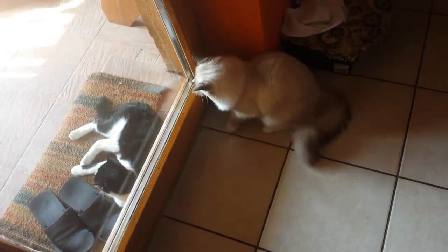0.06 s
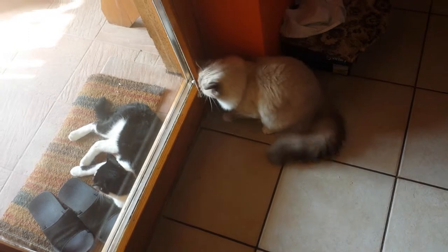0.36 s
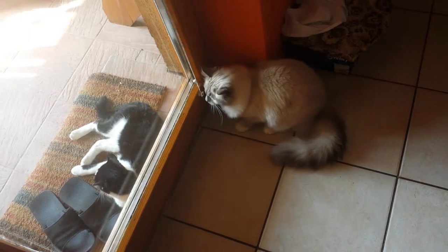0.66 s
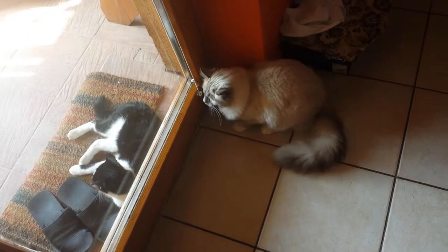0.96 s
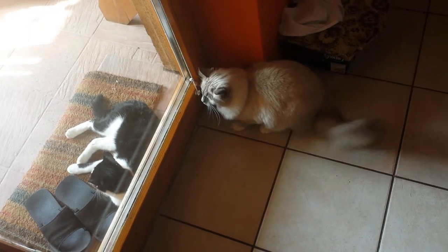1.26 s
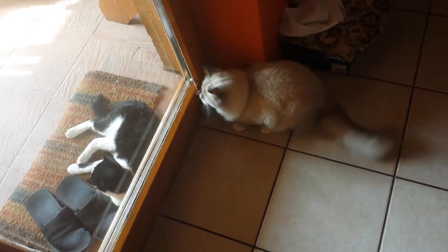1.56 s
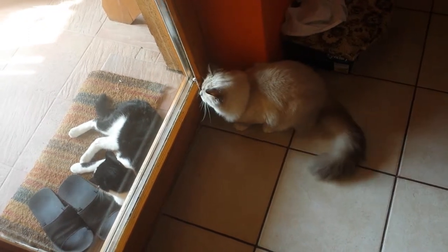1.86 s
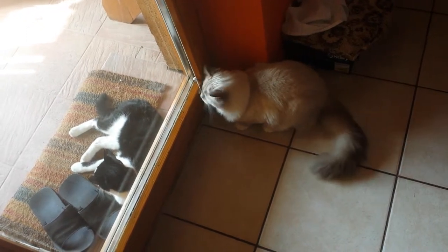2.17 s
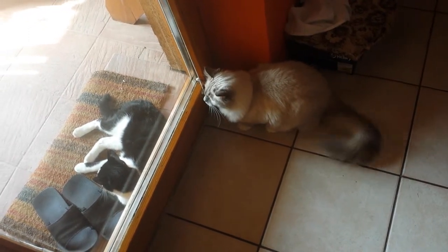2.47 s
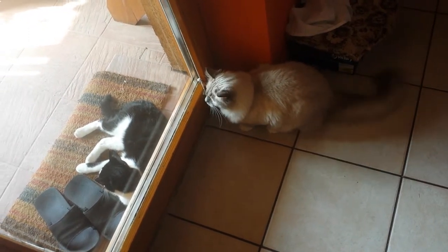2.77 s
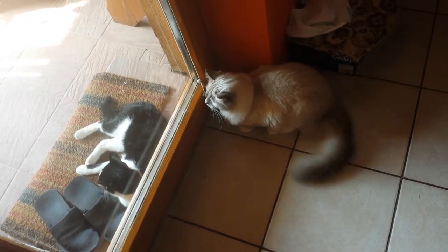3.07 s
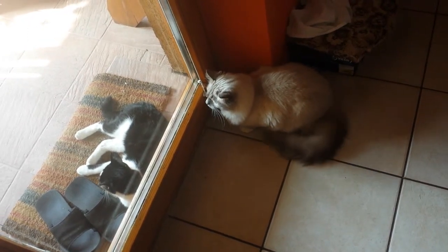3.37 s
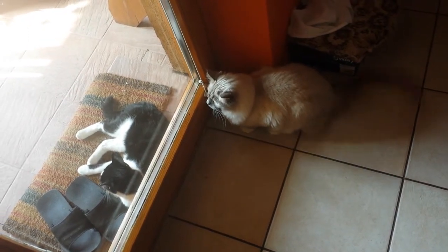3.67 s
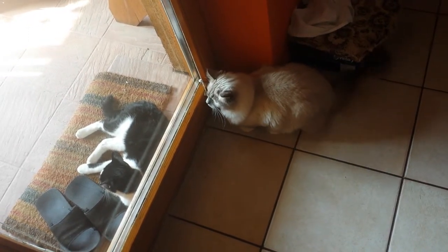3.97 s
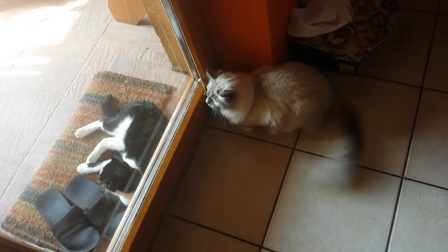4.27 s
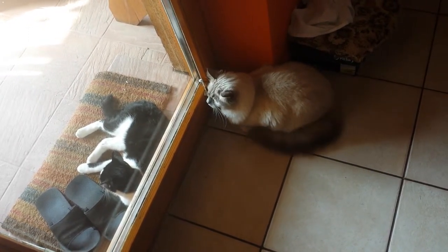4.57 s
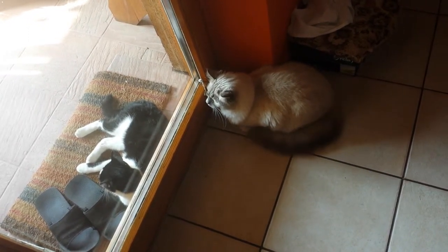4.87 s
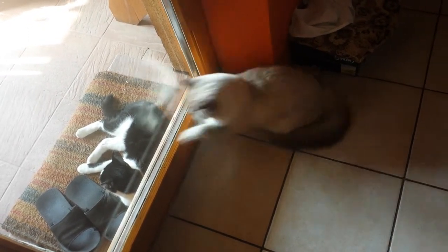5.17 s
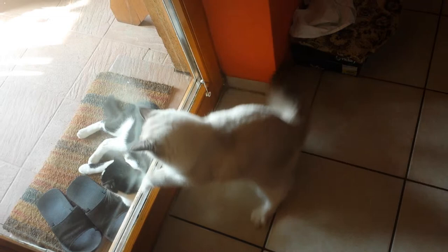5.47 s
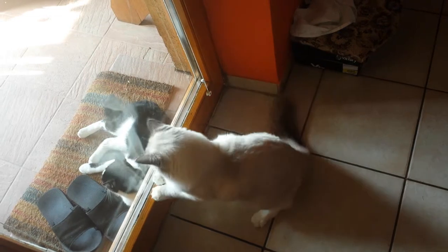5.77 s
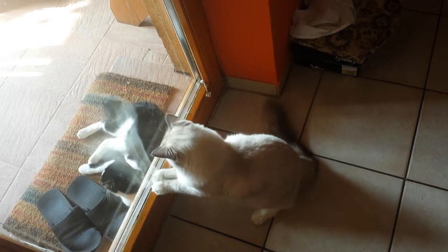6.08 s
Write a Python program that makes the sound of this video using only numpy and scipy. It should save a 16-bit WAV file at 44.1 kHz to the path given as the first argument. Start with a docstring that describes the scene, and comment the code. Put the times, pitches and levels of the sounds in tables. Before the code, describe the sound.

Very quiet, whispery swishes of a cat's tail on tiles come and go over still indoor air and a faint hum. A single hollow thump stands out, and the swishing goes on. Near the end comes a sudden burst of claws on a glass door, a short breathy hiss and scrambling paws, then things settle again. It is heard in stereo in a small, slightly echoing room.

```python
"""Soft swishes come first, over a faint hum: a cat sweeps its furry tail across the tiles of a small room.
It sits by a glass door, glaring at another cat outside. The tail thumps once on a hollow panel.
Then the cat lunges: claws clack on the pane, breath hisses through its throat and teeth, and paws land.
The hard walls echo, and two microphone openings close together (ports) hear it as left and right."""
import sys
import numpy as np
from scipy import signal
from scipy.fft import rfft, irfft, next_fast_len
from scipy.io import wavfile

SR = 44100
rng = np.random.default_rng(int(sys.argv[2]) if len(sys.argv) > 2 else 0)


def wav_record(signal):
    """Record a signal, one row per channel, as 16-bit PCM in the file named by sys.argv[1]."""
    frames = np.transpose(np.atleast_2d(signal))
    bounded = np.clip(frames, -1, 1)
    # unit amplitude maps onto the largest positive 16-bit level
    quanta = np.round(bounded * 32767).astype(np.int16)
    wavfile.write(sys.argv[1], SR, quanta)


N = 279153
TIME = np.arange(N) / SR

# A spectrum lists how strong each frequency is. t60 is the time a sound takes to fade by 60 dB.
# spectrum of still air: f/Hz, level/dB
AIR_SPECTRUM = [(35, -38), (60, -3), (151, -7.5), (209, -8), (408, -7.5), (762, -12), (855, -11.5),
                (1880, -17), (2150, -14.5), (2470, -20), (6840, -19.5), (14000, -23.5), (15000, -32)]
# the hum and the room's own tones: f/Hz, width/Hz, level/dB
HUM_BANDS = [(54.4, 14.8, -70), (81.7, 13.3, -77.5), (147, 16.6, -74.5), (275.7, 26.5, -73.5),
             (381, 45, -76), (1207, 226, -79)]
# how hard the tail brushes the tiles: t/s, level/dB
TAIL_PRESSURE = [(0.17, -88.5), (0.35, -70.5), (0.54, -83), (0.74, -69.5), (1.0, -68), (1.2, -76.2),
                 (1.39, -76.5), (1.58, -65.5), (1.87, -84.5), (1.99, -71.5), (2.35, -69.3), (2.92, -72.3),
                 (3.08, -80), (3.26, -71), (4.24, -69.5), (4.65, -74), (4.8, -74), (5.16, -69),
                 (5.95, -76.5), (6.3, -78)]
# middles of the wide swings, where the tail drags: t/s, level/dB
TAIL_DRAGS = [(.28, -73.5), (.95, -73), (1.195, -71), (1.51, -68.5), (2.45, -71.5)]
# brushing fur as the microphone hears it, with the port's ring near 6 kHz: f/Hz, level/dB
FUR_AT_MIC = [(1500, -11), (2400, -11.5), (3500, -10.5), (5000, -6), (6100, 0), (7500, -9), (10000, -23),
              (14500, -24)]
# spectrum of rubbing fur or paw pads: f/Hz, level/dB
RUB_SPECTRUM = [(60, -8), (150, -8), (350, 10), (800, 5.5), (1400, -2), (2150, -1), (3200, -18),
                (4500, -12.5), (6000, -9), (8500, -11.5), (14500, -21)]
# the tail's quick touches that make up one thump: t/s, level/dB, brightness/Hz
TAIL_HITS = [(3.7814, -36, 248), (3.787, -33, 220), (3.7972, -24.5, 770), (3.8090, -41.5, 1290),
             (3.822, -49, 600)]
# ringing tones of the hollow panel: f/Hz, level/dB, t60/s
PANEL_TONES = [(140, -6.5, 0.082), (210, 5.5, 0.019), (218.3, -23.5, 0.24), (286.9, -7, 0.26),
               (370, -17.5, 0.16), (438, -11.5, 0.084), (621, -7, 0.057), (813, -18.5, 0.1),
               (1095, -17, 0.056), (1370, -22, .06), (2070, -15, 0.027)]
# paws on the tiles and the doorsill: t/s, level/dB, brightness/Hz
PAW_STEPS = [(0.905, -62, 1800), (1.699, -62, 1800), (4.074, -59.5, 1800), (5.117, -46, 606),
             (5.3169, -45, 800), (5.3417, -36, 500), (5.388, -35, 900), (5.458, -41.5, 1800),
             (5.478, -41.5, 440), (5.543, -40.5, 700), (5.604, -36.5, 2000), (5.7738, -54, 2200),
             (6.24, -57.5, 3020)]
# ringing tones of the doorsill: f/Hz, level/dB, t60/s
SILL_TONES = [(162, -13, 0.058), (266, -8, 0.084), (350, -6, 0.098), (616, -15, 0.036), (813, 0, 0.031),
              (1130, -7.5, 0.033), (1476, -0.5, 0.025), (1760, 3, 0.0075), (2030, -4, .012),
              (2380, -3, .01), (5900, -25, .005)]
# claws hitting the glass: t/s, level/dB, brightness/Hz
CLAW_HITS = [(4.935, -50, 1400), (5.3155, -38, 5000), (5.3240, -42, 2600), (5.3409, -23.5, 5200),
             (5.3447, -25, 2300), (5.3494, -24, 2100), (5.3775, -33, 2000)]
# ringing tones of the pane in its frame: f/Hz, level/dB, t60/s
PANE_TONES = [(805, -24, 0.13), (1070, -13, 0.022), (1482, -15, 0.059), (1800, -5.5, 0.033),
              (1910, -1, 0.028), (2020, 1.5, 0.026), (2060, -35, .035), (2970, -18, 0.008),
              (4980, -16, .005), (5790, 0, .005)]
# scratching claw tips as the microphone hears them: f/Hz, level/dB
SCRATCH_AT_MIC = [(300, -21), (1000, -2), (2300, -16), (3600, -1), (4900, 7.5), (5900, 10.5), (7000, -16),
                  (9000, -6), (14500, -13.5)]
# a short spit, then the hiss: t/s, rise/s, hold/s, level/dB
BREATHS = [(5.351, 0.0052, .006, -46.5), (5.396, 0.058, 0.068, -46)]
# bands where the throat rings: f/Hz, width/Hz, level/dB
THROAT_BANDS = [(168, 110, 0.5), (800, 220, 0), (1520, 170, -2.5), (2060, 250, -3.5)]
# air rushing past the teeth, with the microphone port's ring near 6 kHz: f/Hz, level/dB
RUSH_AT_MIC = [(1470, -40), (2500, -5.5), (3130, -7.5), (3860, -5.5), (4230, -5.5), (6060, 3.5),
               (7990, -8.5), (10600, -8), (11500, -14), (13700, -13), (15000, -40)]
# echoes from the floor and near walls: delay/s, level/dB
NEAR_ECHOES = [(.0034, -14), (.0083, -11.5), (0.0133, -14.5)]
# how long the room rings: f/Hz, t60/s
ROOM_FADE = [(100, 0.34), (300, 0.36), (800, 0.28), (2000, 0.46), (6000, 0.4), (14000, 0.49)]
# how alike left and right are: f/Hz, likeness (0 unrelated, 1 the same)
PORT_LIKENESS = [(50, 0.93), (200, 0.81), (500, 0.76), (1000, 0), (2000, 0), (4000, 0), (15000, 0)]
# how much louder the left port is than the right: f/Hz, level/dB
PORT_BALANCE = [(100, -0.5), (700, 0.9), (1200, 1), (2200, 3), (3300, -3), (4500, 1), (6100, 6.5),
                (7500, -1.5), (10500, -1.5), (14500, -1)]

PORT_LAG_S = .00039   # the cat is nearer the right port, so the left hears it later


def from_db(db):
    """Turn decibels into a factor to multiply by."""
    return 10 ** (np.asarray(db) / 20)


def rms_one(x):
    """Scale a signal so that its average strength (rms) is 1."""
    return x / np.sqrt(np.mean(x ** 2) + 1e-20)


def fade(t, t60):
    """Start at 1 and fall by 60 dB every t60 seconds."""
    return np.exp(-np.log(1000) * t / t60)


def at_hz(points, hz):
    """Look up a frequency in a table, gliding between rows in even steps of pitch."""
    f, value = np.transpose(points)
    return np.interp(np.log(hz + 1e-6), np.log(f), value)


def colour(x, spectrum):
    """Turn each frequency up or down as the spectrum says."""
    size = next_fast_len(x.shape[-1] + 4096)
    gain = from_db(at_hz(spectrum, np.fft.rfftfreq(size, 1 / SR)))
    return irfft(rfft(x, size) * gain, size)[..., :x.shape[-1]]


def surround_noise(size=N):
    """White noise from all around: alike at both ports in the bass, unrelated in the treble."""
    padded = next_fast_len(size)
    alike = np.clip(at_hz(PORT_LIKENESS, np.fft.rfftfreq(padded, 1 / SR)), -1, 1)
    mid, side = rfft(rng.standard_normal((2, padded)))
    shared = np.sqrt((1 + alike) / 2) * mid
    opposite = np.sqrt((1 - alike) / 2) * side * [[1], [-1]]
    return irfft(shared + opposite, padded)[:, :size]


def flutter(rate_hz, depth_db):
    """A volume that wanders at random, rate_hz times a second."""
    points = rng.standard_normal(8192)
    return from_db(depth_db * np.interp(TIME * rate_hz, np.arange(len(points)), points))


def resonate(x, hz, width_hz):
    """Let through one band of frequencies, like a space that rings there."""
    r = np.exp(-np.pi * width_hz / SR)
    feedback = [1, -2 * r * np.cos(2 * np.pi * hz / SR), r * r]
    return signal.lfilter(np.array([1, 0, -1]) * (1 - r * r) / 2, feedback, x)


def steep_band(x, hz, width_hz):
    """Resonate twice for a narrower band with steeper sides, at strength 1."""
    return rms_one(resonate(resonate(x, hz, width_hz), hz, width_hz))


def low_pass(x, hz):
    """Gently soften everything above hz."""
    return signal.sosfilt(signal.butter(2, min(hz, SR / 2 - 1000), fs=SR, output="sos"), x)


def high_pass(x, hz):
    """Steeply cut everything below hz."""
    return signal.sosfilt(signal.butter(4, hz, "high", fs=SR, output="sos"), x)


def strike(hits, tones, lowest_hz):
    """Each hit rings all of an object's tones, some more by chance; a soft hit dulls the high ones."""
    out, t = np.zeros(N + SR), np.arange(SR // 2) / SR
    hz, tone_db, t60 = np.transpose(tones)[:, :, None]
    rings = np.sin(2 * np.pi * hz * t) * from_db(tone_db) * fade(t, t60)
    for s, db, bright_hz in hits:
        chance = from_db(rng.standard_normal(len(tones)))
        at = round(s * SR)
        out[at:at + len(t)] += from_db(db) * low_pass(chance @ rings, bright_hz)
    return high_pass(out[:N], lowest_hz)   # a small surface gives off little bass


def scuff(touches, spectrum):
    """Fur, pads or claws slide briefly and unevenly at each touch: t/s, level/dB, t60/s."""
    grip, t = np.zeros(N + SR), np.arange(SR // 2) / SR
    for s, db, t60 in touches:
        at = round(s * SR)
        grip[at:at + len(t)] += from_db(db) * fade(t, t60)
    uneven_grip = grip[:N] * flutter(rate_hz=500, depth_db=6.5)
    return uneven_grip * rms_one(colour(rng.standard_normal(N), spectrum))


def room(x, reverb_db, lag_s):
    """Sound arrives directly, then as a few near echoes, then as a fading wash of echoes (reverb)."""
    t = np.arange(SR * 3 // 4) / SR
    octaves_hz = 60 * 2 ** np.arange(9)
    noise, reverb = surround_noise(len(t)), 0
    build_up = np.clip(t / 0.0028 - .3, 0, 1)   # echoes take a moment to gather
    for low, high in zip(octaves_hz, octaves_hz[1:]):
        band = signal.sosfiltfilt(signal.butter(2, [low, high], "band", fs=SR, output="sos"), noise)
        t60 = at_hz(ROOM_FADE, np.sqrt(low * high))
        reverb = reverb + rms_one(band * build_up * fade(t, t60)) * np.sqrt((high - low) * t60)
    response = from_db(reverb_db) * rms_one(reverb) / np.sqrt(len(t))
    response[0, round(lag_s * SR)] += 1   # direct sound, left
    response[1, 0] += 1   # direct sound, right
    for s, db in NEAR_ECHOES:
        response[:, round(s * SR)] += from_db(db)
    return signal.fftconvolve(np.atleast_2d(x), response, axes=1)[:, :N]


def room_tone():
    """Still air, with narrow bands of noise for the low hum and the room's own tones."""
    noise = surround_noise()
    hum = sum(from_db(db) * steep_band(noise, hz, 2 * width) for hz, width, db in HUM_BANDS)
    air = from_db(-65.5) * rms_one(colour(surround_noise(), AIR_SPECTRUM))
    return air + hum


def tail_sweeps():
    """Long fur whispers over the tiles; it rasps as it presses harder, most in the wide swings."""
    pressure_db = np.interp(TIME, *np.transpose(TAIL_PRESSURE))
    rasp_level = from_db(-78.5 + 0.74 * (pressure_db + 71))   # grows more slowly than the whisper
    drag_length_s = 0.19
    for s, db in TAIL_DRAGS:
        swell = np.cos(np.pi * np.clip((TIME - s) / drag_length_s, -.5, .5))
        rasp_level = np.hypot(rasp_level, from_db(db) * swell)
    whisper = from_db(pressure_db + 2.6) * rms_one(colour(surround_noise(), FUR_AT_MIC))
    rasp = rasp_level * steep_band(surround_noise(), hz=2310, width_hz=1300)
    return (whisper + rasp) * flutter(rate_hz=120, depth_db=1.0)


def tail_thump():
    """Fur touches first, then the weight of the tail makes the hollow panel boom."""
    boom = strike(TAIL_HITS, PANEL_TONES, lowest_hz=135)
    rub = from_db(-33.5) * scuff([(s, db, .25) for s, db, _ in TAIL_HITS], RUB_SPECTRUM)
    first_touch_s = TAIL_HITS[0][0]
    brush = scuff([(first_touch_s, -65, .12)], FUR_AT_MIC)
    return room(boom, reverb_db=-1.5, lag_s=.00002) + room(rub + brush, reverb_db=3.5, lag_s=.00002)


def paws():
    """Soft pads knock and slide: light shifts while crouching, then the scramble and the landing."""
    knocks = strike(PAW_STEPS, SILL_TONES, lowest_hz=96)
    # heavier steps grip sooner: 16 dB more halves the slide time
    slips = [(s, db, 0.07 * 2 ** ((-39 - db) / 16)) for s, db, _ in PAW_STEPS]
    slides = from_db(-7) * scuff(slips, RUB_SPECTRUM)
    return room(knocks + slides, reverb_db=-2.0, lag_s=PORT_LAG_S * 0.41)


def claws():
    """Claws clack on the glass and bounce; the harder the contact, the more the tips scratch."""
    clacks = room(strike(CLAW_HITS, PANE_TONES, lowest_hz=670), reverb_db=-4.5, lag_s=PORT_LAG_S)
    # a hit twice as bright scratches 12 dB louder
    tips = [(s, db - 8.5 + 12 * np.log2(bright_hz / 3500), .011) for s, db, bright_hz in CLAW_HITS]
    scratches = room(scuff(tips, SCRATCH_AT_MIC), reverb_db=-6, lag_s=PORT_LAG_S)
    return (clacks + scratches) * from_db([[-1.5], [1.5]])   # a little to the right


def hiss():
    """Each push of air swells, holds and dies away; it rings the throat and rushes past the teeth."""
    breath = 0
    for s, rise_s, hold_s, db in BREATHS:
        swell = np.clip((TIME - s) / rise_s, 0, 1)
        release = fade(np.maximum(TIME - s - rise_s - hold_s, 0), t60=0.13)
        breath = breath + from_db(db) * swell * release
    air, throat = rng.standard_normal(N), 0
    for k, (hz, width, db) in enumerate(THROAT_BANDS):
        # flipping every other band keeps neighbours from cancelling between their peaks
        throat = throat + (-1) ** k * from_db(db) * resonate(air, hz, width)
    throat = rms_one(high_pass(low_pass(throat, hz=2750), hz=67))
    throat = from_db(2) * throat * flutter(rate_hz=170, depth_db=4.0)
    rush = rms_one(colour(rng.standard_normal(N), RUSH_AT_MIC)) * flutter(rate_hz=370, depth_db=3.5)
    return room((throat + rush) * breath, reverb_db=-1.5, lag_s=PORT_LAG_S * .7)


def scene():
    """The cat and the room around it."""
    return tail_sweeps() + tail_thump() + claws() + hiss() + paws() + room_tone()


def record(dry):
    """Each port colours the sound its own way; the deepest bass and the highest treble are cut."""
    left = colour(dry[0], [(hz, db / 2) for hz, db in PORT_BALANCE])
    right = colour(dry[1], [(hz, -db / 2) for hz, db in PORT_BALANCE])
    treble_cut = signal.ellip(12, .1, 70, 14650, fs=SR, output="sos")
    return signal.sosfilt(treble_cut, high_pass(np.array([left, right]), hz=39))


dry = scene()
out = record(dry)
wav_record(out)
```